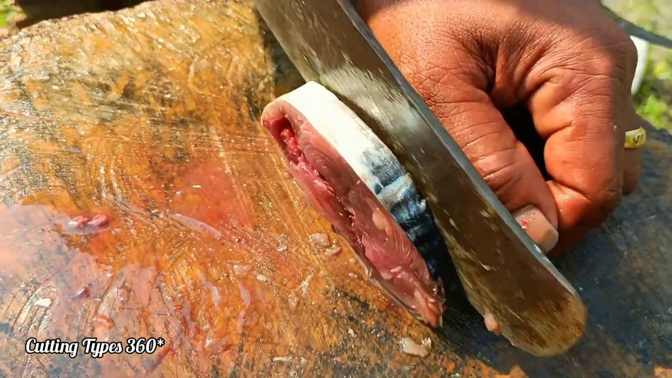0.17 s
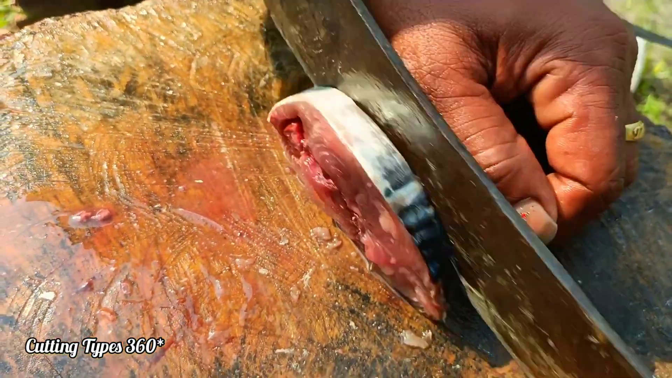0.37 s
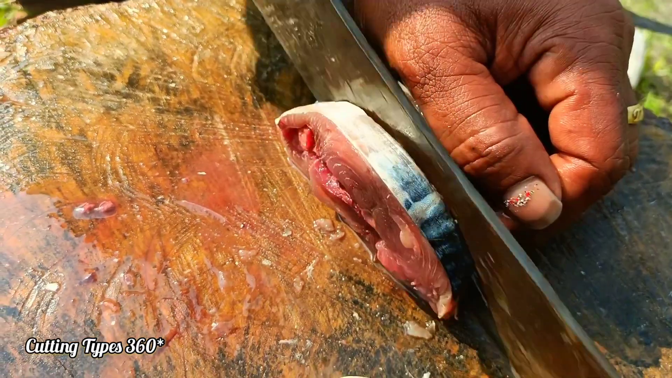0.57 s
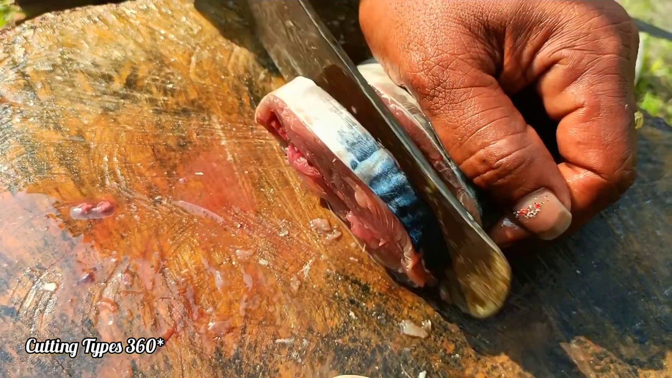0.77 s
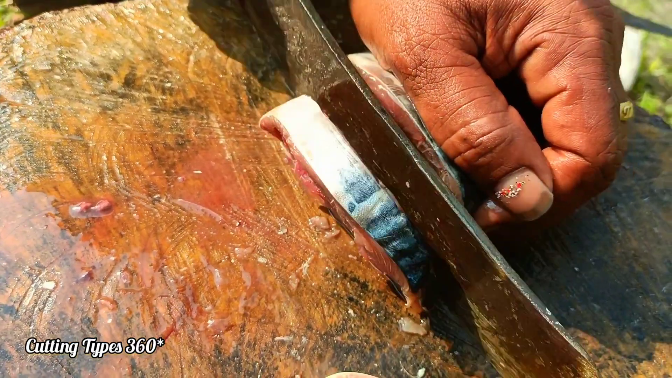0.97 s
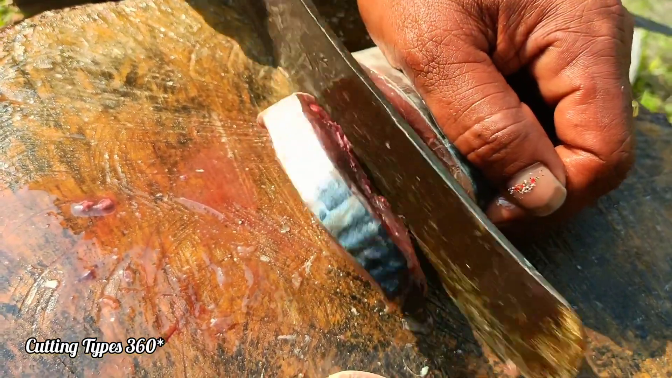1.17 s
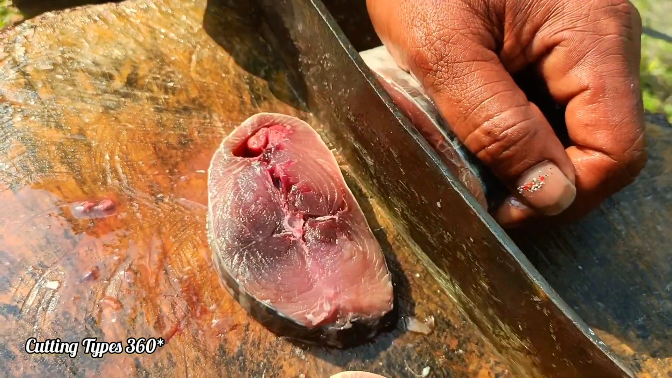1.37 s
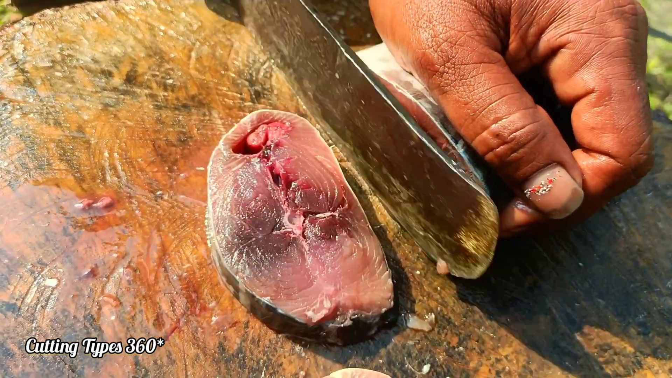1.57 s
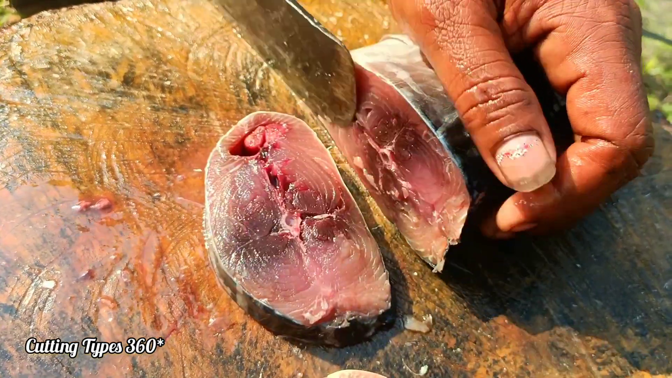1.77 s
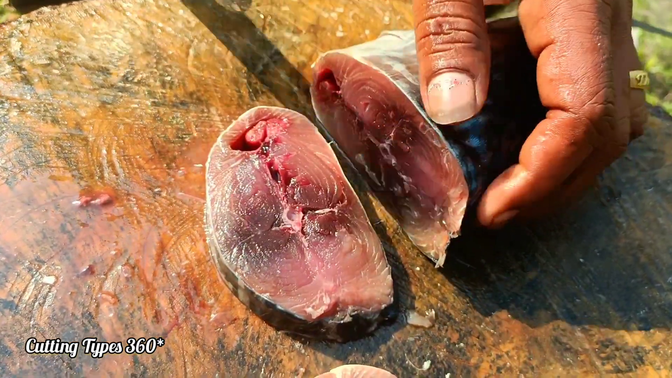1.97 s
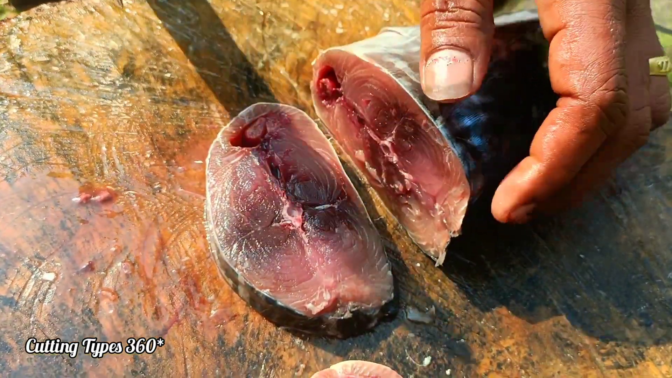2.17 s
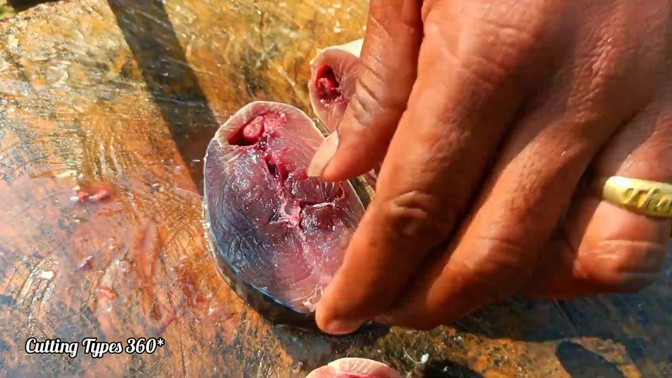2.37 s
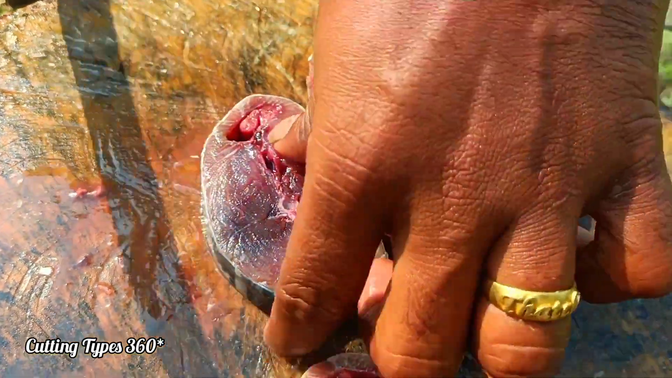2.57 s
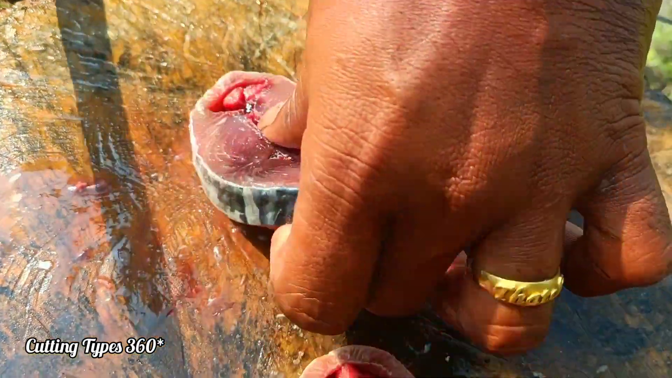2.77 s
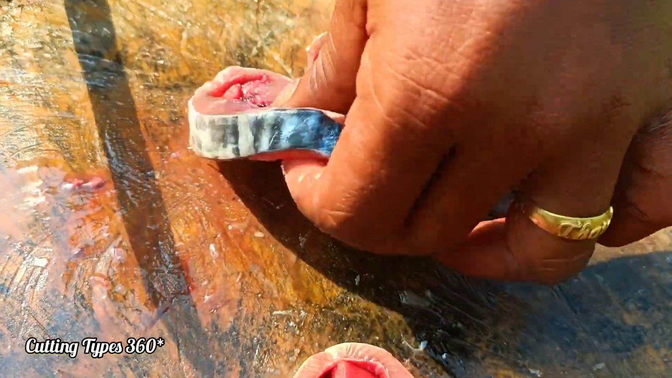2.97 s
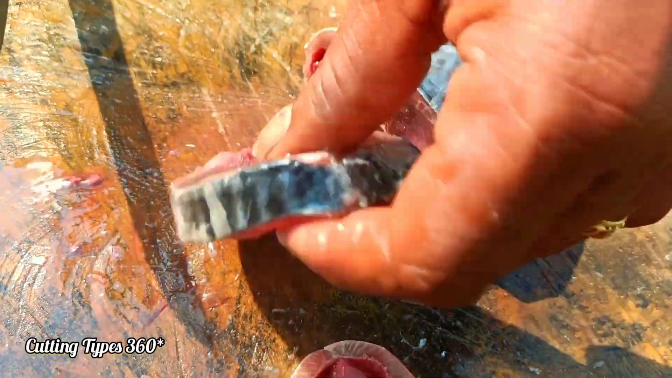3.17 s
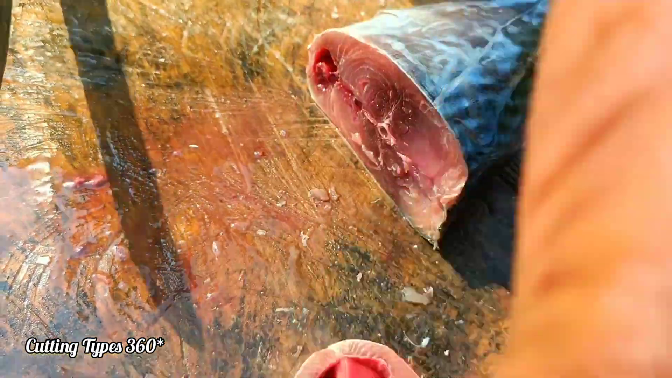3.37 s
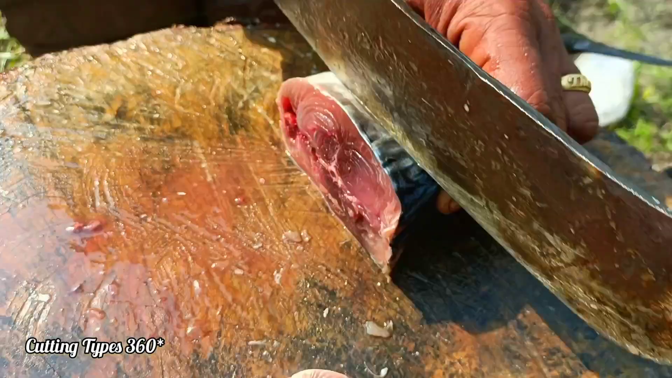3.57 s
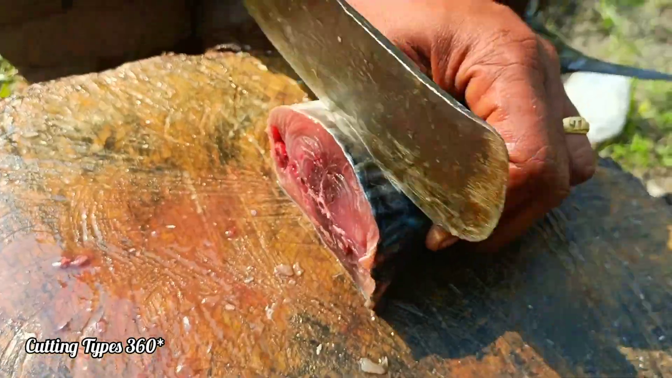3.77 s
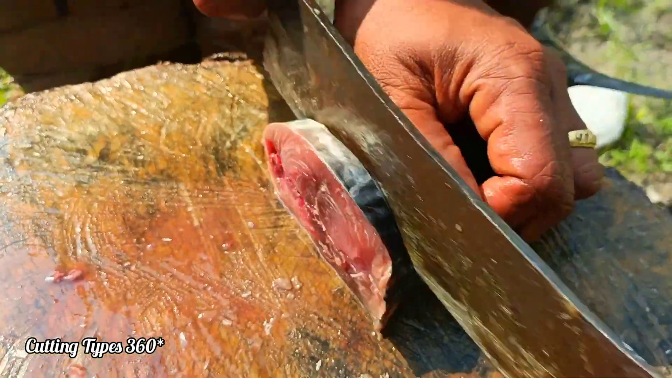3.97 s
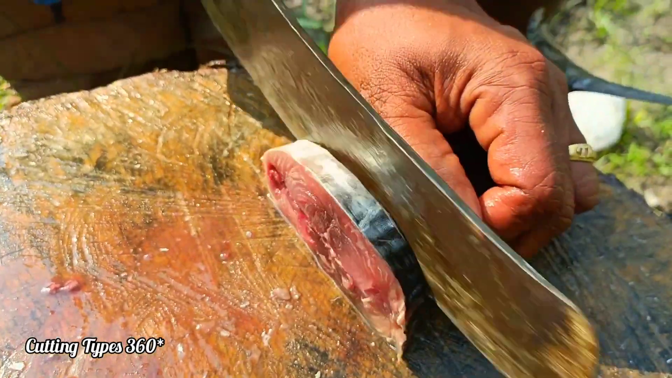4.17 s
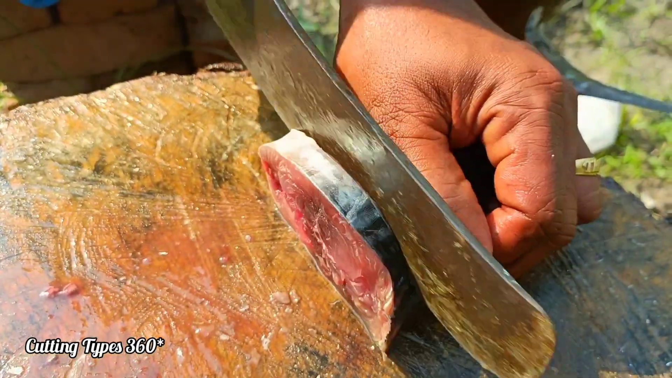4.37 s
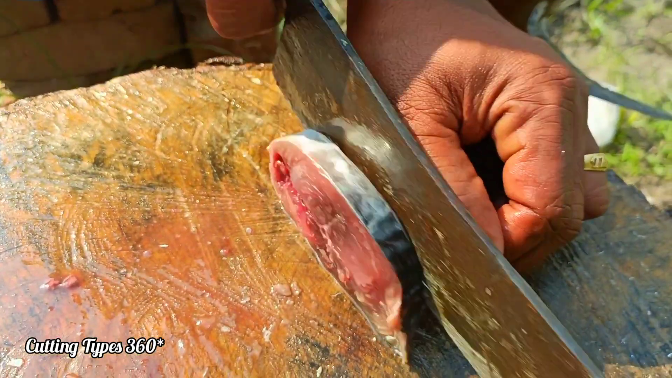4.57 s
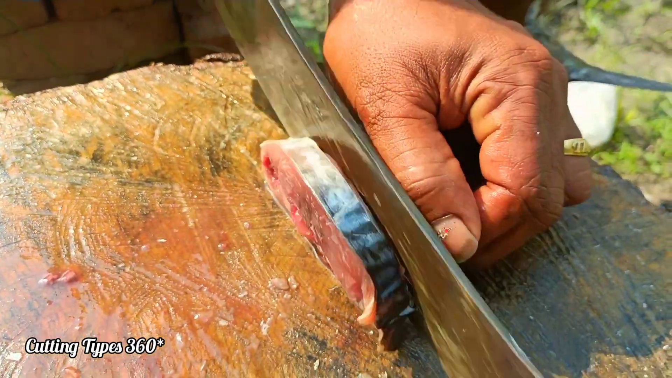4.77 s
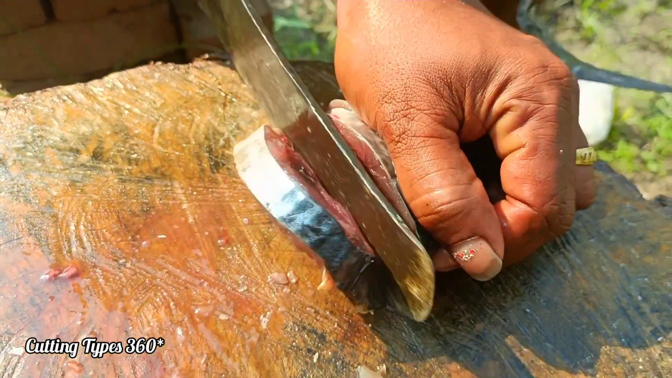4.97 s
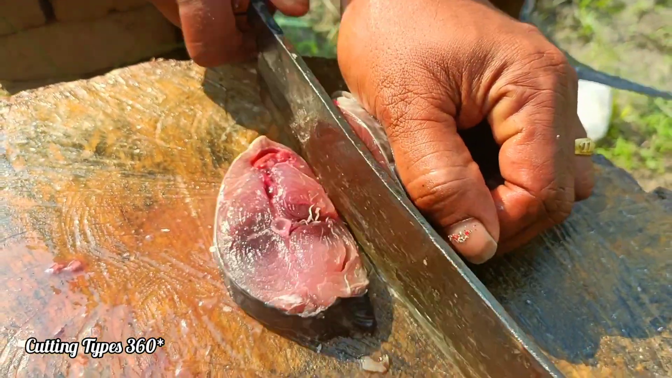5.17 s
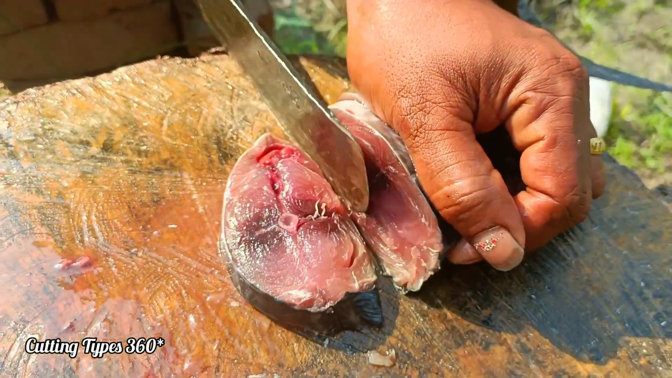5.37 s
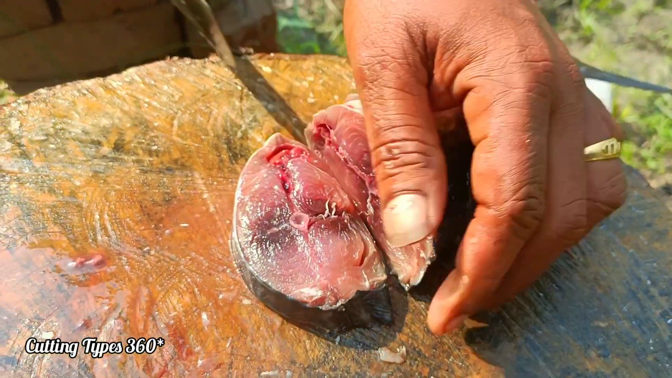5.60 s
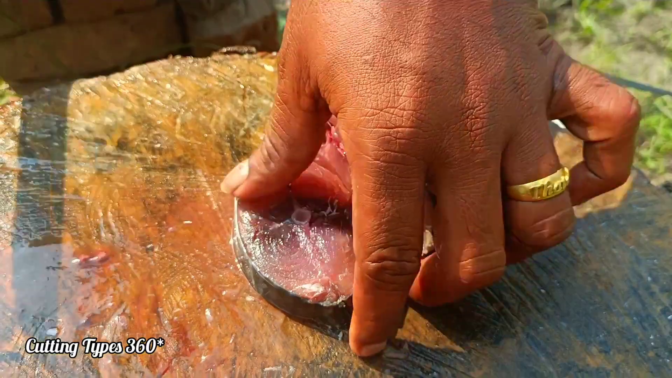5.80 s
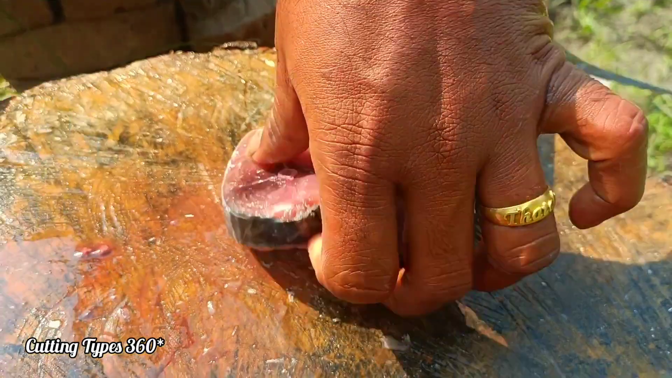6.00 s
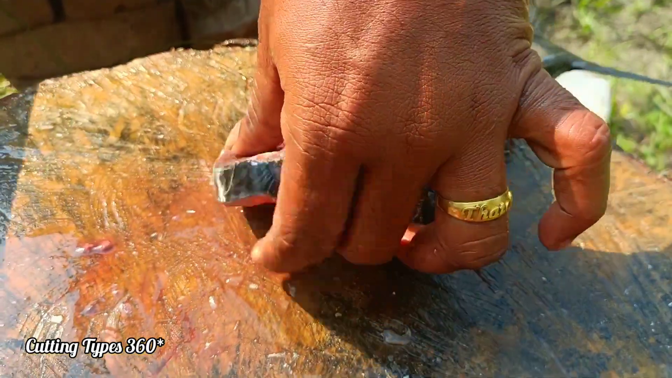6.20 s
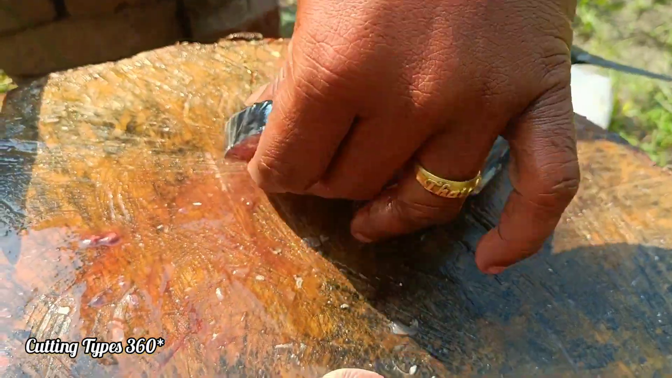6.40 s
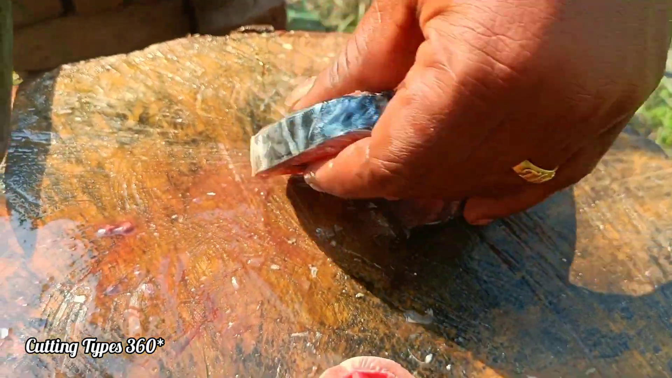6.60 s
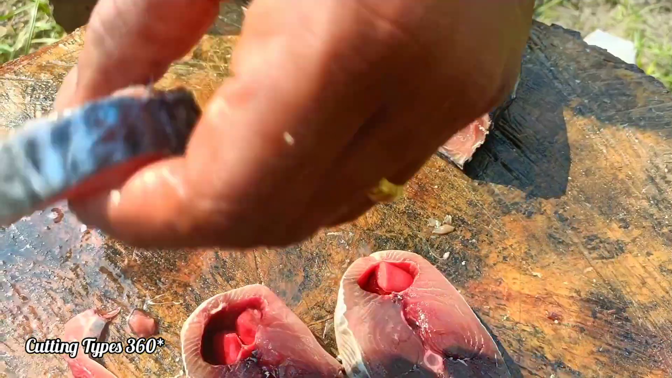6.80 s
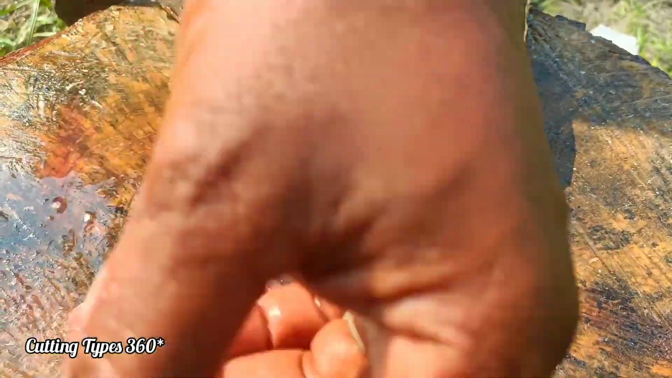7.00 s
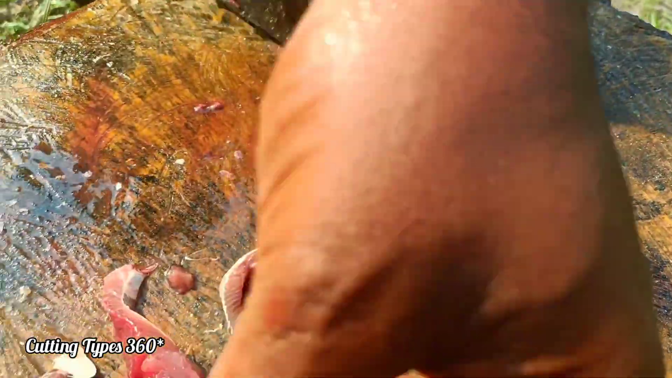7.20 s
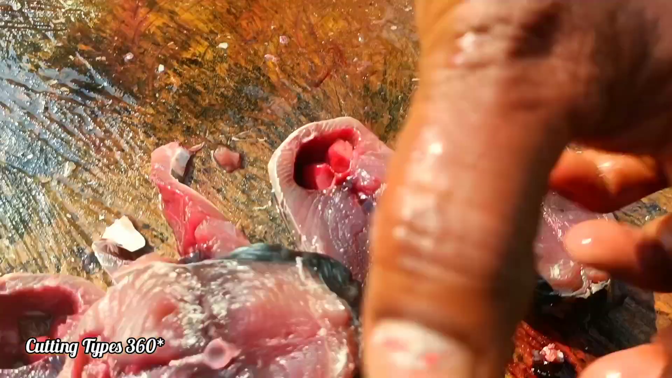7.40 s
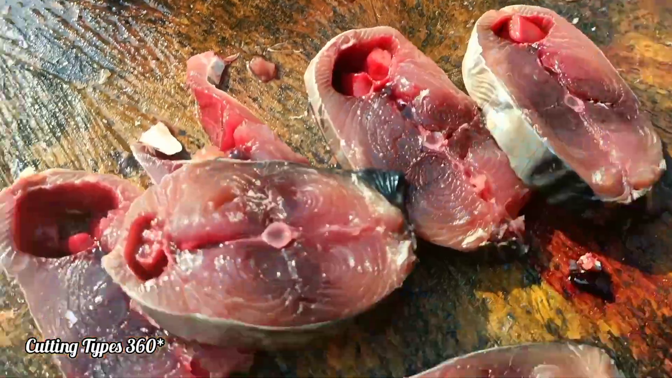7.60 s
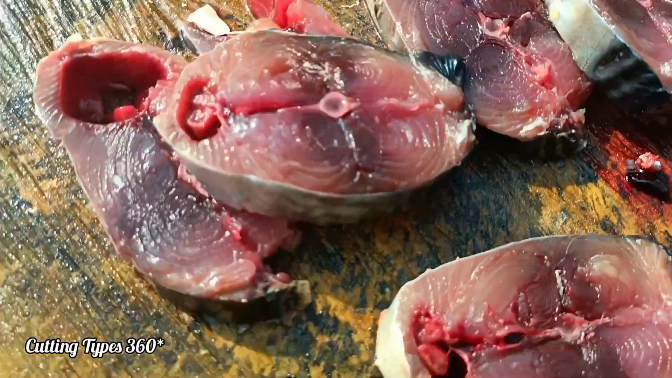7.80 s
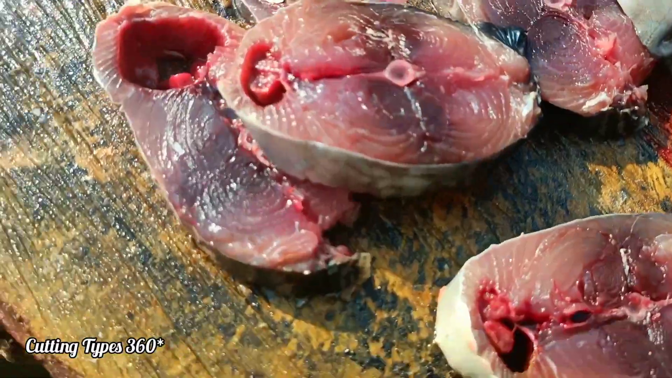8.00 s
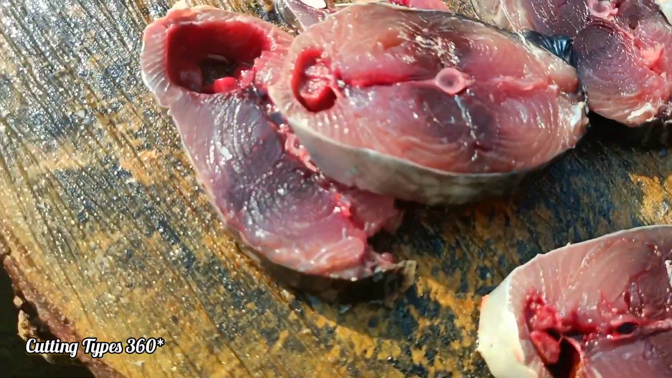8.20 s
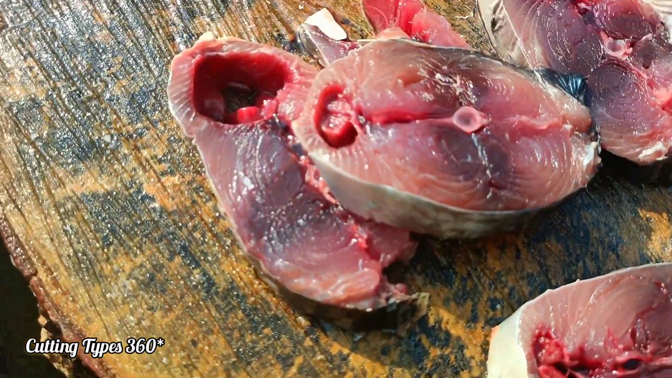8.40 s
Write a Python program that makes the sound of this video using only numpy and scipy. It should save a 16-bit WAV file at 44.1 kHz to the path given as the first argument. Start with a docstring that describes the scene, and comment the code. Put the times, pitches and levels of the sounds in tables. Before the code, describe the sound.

Two bursts of fast, grainy sawing with snapping fibres, a quiet handling gap after each, and finally a run of rubbery squeals.

```python
"""A heavy knife saws steaks off a fish on a wooden block outdoors: grainy friction noise, split into bands.
Noise bursts are snapping fibres, clicked modes are knocks on the wood, noise-fed modes are the dragged blade.
Rough squeals are stick-slip partials; low damped sines are soft low thumps of wind and handling at the microphones.
An insect buzzes in narrow-band noise over an open-air floor and a little wind.
Two microphone ports, each with its own resonances, pick up the scene."""
import sys
import numpy as np
from scipy import signal
from scipy.fft import rfft, irfft
from scipy.io import wavfile
from scipy.ndimage import uniform_filter1d

SR = 44100
rng = np.random.default_rng(int(sys.argv[2]) if len(sys.argv) > 2 else 0)


def master_out(mix):
    """Clip the mix to full scale and print it as 16-bit PCM to the path in sys.argv[1]."""
    frames = np.transpose(np.atleast_2d(mix))
    ceiling = np.clip(frames, -1, 1)
    pcm = np.round(ceiling * 32767).astype(np.int16)
    wavfile.write(sys.argv[1], SR, pcm)


N = 372644  # samples

# The blade's flat dragged over wood or bone. Each row: start and end of the full level in seconds,
# ringing level in dB, its change in dB, lift of the low modes in dB per octave.
DRAGS = [(1.45, 1.83, -59, -4.5, 3), (3.7, 3.766, -66.5, 5, -6), (3.85, 3.855, -57, 8, -8),
         (5.3, 5.43, -52.5, -12, 2.5), (5.49, 5.5, -52.5, -5, 0.5), (6.03, 6.13, -71, -14, 3),
         (6.162, 6.168, -64.5, 8.5, -18), (6.19, 6.196, -70.5, -11, 2.5), (6.212, 6.218, -57, -14, -5.5),
         (6.702, 6.748, -42, -10.5, -7.5)]
# Bending modes of the steel blade. Each row: frequency in Hz, level in dB, 60 dB decay time in seconds.
BLADE_MODES = [(1060, -12, .04), (1750, -8, .05), (2005, -9, .06), (2985, -9, .11), (3350, -12, .05),
               (4160, -5, .1), (4950, -14, .05), (5300, -12, .05), (6260, -8, .05), (7200, -13, .05),
               (8285, -6, .07), (9500, -12, .05), (12200, -21, .05), (13800, -21, .05), (15200, -21, .05)]
TOUCH_DB_PER_S, LIFT_DB_PER_S = 1211, 1097.5   # rise and fall of a drag
PORT_DELAY = 11   # samples; the ports lie a few cm apart


def amp(db):
    """Converts a level in dB to a linear gain."""
    return np.exp(np.asarray(db) * (np.log(10) / 20))


def unit(x):
    """Normalises power: scales to rms 1."""
    return x / np.sqrt(np.mean(x ** 2) + 1e-20)


def butter(x, hz, kind, order=2):
    """Limits the bandwidth with a maximally flat low-, high- or band-pass."""
    return signal.sosfilt(signal.butter(order, hz, kind, fs=SR, output="sos"), x)


def wander(rate_hz, size=1):
    """Slow random modulation: low-passed noise of rms 1."""
    step = 1 if rate_hz > 100 else 32   # drawn coarsely when it is slow
    noise = rng.standard_normal((size, N // step + 3000))
    slow = butter(noise, rate_hz * step, "low")[:, 2000:]   # the filter's onset is dropped
    return np.squeeze([np.interp(np.arange(N) / step, np.arange(len(v)), unit(v)) for v in slow])


def pair(x):
    """Spatial coherence: two draws become left and right, alike in the bass and unrelated above."""
    shared_hz = 680   # both ports hear the same pressure below this
    return butter(x[0], shared_hz, "low") + butter(x, shared_hz, "high")


def ring(x, hz, t60):
    """A damped resonator: a unit click sets a decaying sine of height 1 ringing."""
    radius = amp(-60 / (t60 * SR))
    w = 2 * np.pi * hz / SR
    return signal.lfilter([0, np.sin(w)], [1, -2 * radius * np.cos(w), radius * radius], x + 1e-18)


def peaks(x, table):
    """Resonances in series: a chain of filters, each a peak or a dip."""
    for hz, width_hz, db in table:
        w, g = 2 * np.pi * hz / SR, amp(db / 2)
        k = np.sin(w) * width_hz / hz / 2
        zeros = [1 + k * g, -2 * np.cos(w), 1 - k * g]
        poles = [1 + k / g, -2 * np.cos(w), 1 - k / g]
        x = signal.lfilter(zeros, poles, x)
    return x


def played(rows, rise_db_per_s, fall_db_per_s):
    """Masking by the loudest event: gives its level in dB, age in seconds and smoothed further columns.

    Each event rises, holds with a steady change and falls, all linear in dB."""
    t, rows = np.arange(N) / SR, np.array(rows, float)
    level_db, loudest = np.full(N, -120.0), np.zeros(N, int)
    rises = rise_db_per_s * np.ones(len(rows))
    for k, ((start, end, db, change_db), rise) in enumerate(zip(rows[:, :4], rises)):
        times = [start - 1, start, max(end, start + 1 / SR), end + 1]
        own_db = db + np.interp(t, times, [-rise, 0, change_db, change_db - fall_db_per_s])
        loudest[own_db > level_db] = k
        level_db = np.maximum(level_db, own_db)
    age = t - rows[loudest, 0]
    return level_db, age, *uniform_filter1d(rows[loudest, 4:].T, size=300)


def air():
    """Diffuse noise with a shaped spectrum is far rustle and rumble; wind adds separate lumpy bass at each port."""
    # Spectrum of the open-air floor. Each row: frequency in Hz, relative level in dB per Hz.
    air_spectrum = [(30, -45), (70, -29.5), (120, 2.5), (180, -7.5), (280, -14), (600, -17.5),
                    (2000, -22.5), (5000, -29.5), (9000, -35.5), (16000, -34)]
    points_hz, points_db = np.transpose(air_spectrum)
    hz = np.maximum(np.arange(N // 2 + 1) * SR / N, 1)
    shape = amp(np.interp(np.log(hz), np.log(points_hz), points_db))
    far = unit(irfft(rfft(pair(rng.standard_normal((2, N)))) * shape, N))
    wind = unit(butter(rng.standard_normal((2, N)), [45, 130], "band")) * amp(1.3 * wander(3))
    return amp(-65.5) * far + amp([[-68], [-75]]) * wind


def insect():
    """Narrow-band noise from one sharp resonance makes short buzzes that swell and fade."""
    # Each row: start in seconds, length in seconds, level in dB.
    buzz_rows = [(2.193, 0.18, -67.5), (2.786, 0.15, -71.5), (3.364, 0.13, -70), (7.163, 0.17, -71.5),
                 (7.859, 0.12, -72)]
    buzz_hz, width_hz = 7500, 130
    swell = np.zeros(N)
    for s, length, db in buzz_rows:
        at, n = round(s * SR), round(length * SR)
        swell[at:at + n] = amp(db) * np.sqrt(np.hanning(n))
    t60 = np.log(1000) / np.pi / width_hz   # a narrow resonance decays slowly
    return swell * unit(ring(rng.standard_normal((2, N)), buzz_hz, t60))


def thumps():
    """Heavily damped low resonance: soft low thumps of wind and handling at the microphones."""
    # Each row: time in seconds, level in dB, frequency in Hz, left-right difference in dB.
    thump_rows = [(2.31, -51, 116, 10), (3.315, -38, 97.5, 22), (3.441, -41.5, 70.5, 19.5),
                  (3.967, -51, 96, -22), (5.119, -45, 102, 15), (6.222, -36.5, 68.4, 18),
                  (8.098, -44, 107.4, -12), (8.298, -39, 107, 6)]
    out = np.zeros((2, N))
    for s, db, hz, pan_db in thump_rows:
        push = np.zeros(N)
        push[round(s * SR)] = amp(db)
        thump = butter(ring(push, hz, 0.038), 194, "low", order=4)
        out += thump * amp([[pan_db / 2], [-pan_db / 2]])
    return out


def knocks():
    """Impulse response of a modal body: the edge meets the block and its modes ring."""
    # Each row: time in seconds, relative level in dB.
    knock_rows = [(0.627, -28), (4.812, -19.5), (5.981, -29)]
    # Modes of the wooden block. Each row: frequency in Hz, level in dB, 60 dB decay time in seconds.
    block_modes = [(279, 8, 0.045), (429, 9, 0.025), (539, -2.5, 0.043), (1000, -9.5, 0.042),
                   (1420, -14, 0.0093)]
    hits = np.zeros(N)
    for s, db in knock_rows:
        hits[round(s * SR)] = amp(db - 7.5)
    out = sum(amp(db) * ring(hits, hz, t60) for hz, db, t60 in block_modes)
    return np.array([butter(out, 296, "high", order=3)] * 2)


def snaps():
    """Sudden release of tension: each snap is a noise burst of a millisecond or two in three bands."""
    # Fibres snap, the edge ticks, fingers unstick. Each row: time in seconds, relative level in dB,
    # dull part in dB, bright part in dB, left-right difference in dB.
    snap_rows = [(0.0916, -2, -14, -15, 2), (0.253, -14, -11, -19, -6), (0.2746, -14, -6, -18, -8),
                 (0.2916, -4, -15, -16, -1), (0.3348, -10, -9, -10.5, -5), (0.3902, -17.5, -7, -9, 3),
                 (0.3995, -16, -29, -14, -5), (0.4215, -8.5, -18, -9, -3), (0.443, -7, -5, -18, 11),
                 (0.477, -14, -17.5, -14, -0.5), (0.56, -9.5, -6.5, -22, 4.5), (0.576, -11, -2.5, -27, 6),
                 (0.636, -23, 4.5, -27, 20), (0.7085, -27, 5, -26, 20), (0.8, -20.5, -22, -7.5, 14),
                 (0.86, -17, -35, -22, 0), (1.03, -21, -30, -26, 1), (1.1815, -24, -27, -22, 1),
                 (1.2982, -26, 4.5, -9, -3), (1.3051, -21, -13, -10, 4.5), (1.3128, -33.5, -1.5, -15, -23),
                 (2.1944, -53, 18, -29, 5), (2.456, -50, 8, -14, -4), (2.6398, -36, -12, -2, -3),
                 (2.685, -47.5, 15, -27, 7), (2.7036, -37, -12, -27, 7), (2.8024, -58, -18, -3, -4),
                 (2.835, -55, -7.5, -5, 10), (3.3597, -58.5, -26.5, 7, -0.5), (3.4087, -58.5, -21, 35.5, 0),
                 (3.5084, -21, -4.5, -15, -9), (3.5298, -8, -8, -4.5, -3.5), (3.898, -15, -6.5, -14, -3),
                 (3.9542, -17, -9, -27, -1), (4.15, -26, -1, -5.5, 3), (4.2905, -21, -8, -30, 11),
                 (4.4482, -32, -28, -1, 9), (4.4726, -16, -4, -10, 4), (4.5573, -5.5, -7.5, -12, -2.5),
                 (4.621, -9.5, -30, -14.5, 7), (4.7548, -21.5, 2, 5, -4), (4.8747, -14.5, 1, -20, 8.5),
                 (5.0513, -21, -22, -14, 3), (5.166, -22, -4.5, -10, 5), (5.493, -41, -2, -17, 5),
                 (5.7867, -65, 6, 19, -2.5), (6.3447, -52, -14.5, 12.5, -4), (6.516, -52, -20, -7, 7),
                 (6.6024, -71, -19, 9, 8), (6.6834, -23, 0, -16, -5), (6.6928, -22.5, -5.5, -9, 9),
                 (7.3672, -54, -5, -1.5, 27.5), (7.3744, -43.5, -7.5, 15, -4), (7.4268, -35, 17, -12, -8.5),
                 (7.463, -16.5, -8, -18.5, -2.5)]
    decay_s, attack_s, length = .0016, .0003, 600   # length in samples
    out, t = np.zeros((2, N + length)), np.arange(length) / SR
    puffs = rng.standard_normal((len(snap_rows), 2, length))
    for (s, db, dull_db, bright_db, pan_db), puff in zip(snap_rows, puffs):
        burst = puff * np.exp(-t / decay_s) * np.minimum(t / attack_s, 1)
        crack = butter(burst, [3400, 7200], "band", order=3)
        crack += amp(dull_db + 3.0) * butter(burst, [900, 3200], "band")
        bright_hz = np.clip(8986 + 150 * bright_db, 7000, 12500)   # a stronger bright part starts higher
        crack += amp(bright_db + 12) * butter(burst, bright_hz, "high", order=3)
        at = round(s * SR)
        out[:, at:at + length] += amp(db - 8) * crack * amp([[pan_db / 2], [-pan_db / 2]])
    return out[:, :N]


def squeals():
    """Stick-slip oscillation, about a thousand a second; roughness smears the partials, the upper ones most."""
    # Each row: start and end of the full level in seconds, relative level in dB, its change in dB,
    # swell in seconds, slip rate in Hz, rate it slides to in Hz, roughness 0-1, pressure 0-1,
    # odd partials from the third up in dB (every second slip is weaker at times).
    squeal_rows = [(2.355, 2.448, -69, 11.5, 0.12, 737, 782, 0.98, 0.38, -22),
                   (2.677, 2.675, -59.5, -1.5, .025, 583, 900, 0.6, 0.44, -13),
                   (4.58, 4.651, -41.5, 2, .015, 936, 996, 0.36, 0.66, -34),
                   (5.795, 5.815, -59, -2, .03, 1000, 1036, 0.93, 0.24, -25),
                   (5.865, 5.961, -41, 3.5, 0.06, 949, 1071, 0.4, 0.69, -15.5),
                   (6.005, 6.026, -42, -3, 0.014, 1000, 1040, 1, 0.45, -14),
                   (6.09, 6.1, -55, 4.5, 0.029, 993, 920, 0.94, 0.32, -31),
                   (7.335, 7.348, -48.5, -0.5, .012, 993, 780, 0.37, 0, 2.5),
                   (7.365, 7.4, -51.5, -3, 0.029, 810, 850, 0.72, 0.16, 12.5),
                   (7.417, 7.449, -47.5, -4.5, 0.0094, 1158, 1030, 0.8, 0.59, 6),
                   (7.493, 7.54, -51, -3.5, 0.06, 1064, 1016, 0.66, 0.58, 0),
                   (7.581, 7.572, -57, 0.5, .03, 1014, 1010, 0.94, 0.38, 5),
                   (7.615, 7.624, -69.5, -2, 0.034, 987, 988, 1, 0.46, 10.5),
                   (7.705, 7.744, -48, 8.5, .03, 991, 1079, 0.58, 0.55, 3.5),
                   (7.798, 7.823, -41.5, -8, 0.0088, 1024, 930, 0.39, 0.44, 5.5),
                   (7.904, 7.907, -60, -0.5, 0.0074, 983, 960, 0.49, 0.27, -7),
                   (7.931, 7.97, -45.5, 11.5, 0.013, 973, 1049, 0.5, 0.36, -7),
                   (7.96, 8.009, -37.5, -11, 0.032, 1013, 1004, 0.57, 0.41, -0.5),
                   (8.04, 8.042, -35.5, -2.5, 0.0048, 1022, 697, 0.15, 0.12, -13.5),
                   (8.076, 8.09, -60.5, -3, 0.015, 965, 996, 0.8, .03, -6)]
    # Each row: multiple of the slip rate, level in dB at no pressure, level in dB at full pressure.
    partials = [(1, -6, -31), (2, 6.5, 0.5), (3, -9, 6), (4, -41.5, 17), (5, -25.5, -13.5), (6, -54, -13),
                (7, -33, -26.5), (8, -53.5, -9.5), (9, -59.5, -10.5)]
    swell_db, die_db_per_s, slide_s = 25.5, 698.5, .046
    rises = swell_db / np.transpose(squeal_rows)[4]
    db, age, _, first_hz, last_hz, rough, pressure, odd_db = played(squeal_rows, rises, die_db_per_s)
    # The slide is already under way during the swell.
    hz = first_hz + (last_hz - first_hz) * np.clip(age / slide_s, -1.1, 1)
    phase = 2 * np.pi * np.cumsum(hz * (1 + 0.01044 * wander(135))) / SR
    out = 0
    for k, soft_db, hard_db in partials:
        smear = np.clip(rough * (0.5 + 0.21 * k), 0, 1)
        a, b = wander(110 + 35 * k, size=2)
        flutter = a * np.cos(k * phase) + b * np.sin(k * phase)   # a partial widened into a noise band
        line = np.sqrt(2) * np.sin(k * phase) * (1 + rough * wander(73))
        partial_db = soft_db + pressure * (hard_db - soft_db)
        if k % 2 and k > 1:
            partial_db = partial_db + odd_db
        out = out + amp(partial_db) * ((1 - smear) * line + smear * flutter)
    # Pressed hard, the contact also rasps, more so in loud squeals.
    hiss = unit(butter(rng.standard_normal(N), [2700, 7500], "band"))
    rasp_db = -7.5 + 0.61 * (db + 38.5)
    out = out + amp(rasp_db) * pressure ** 2 * amp(3 * wander(90)) * hiss
    call = amp(db + 5.5) * out
    # The steel rings along.
    call = call + 0.011 * sum(amp(mode_db) * ring(call, mode_hz, t60) for mode_hz, mode_db, t60 in BLADE_MODES)
    echo = 0.11 * np.roll(call, round(.031 * SR))   # off a nearby wall
    left = np.roll(call, 10) * amp(-7.0) + echo     # later and weaker than the right
    right = call + np.roll(echo, 300)
    return np.array([left, right])


def blade():
    """Friction-driven modal vibration: rubbing noise feeds the steel's modes, each with a changing grip."""
    ring_db, _, lift_db = played(DRAGS, TOUCH_DB_PER_S, LIFT_DB_PER_S)
    out, grips = 0, amp(3.2 * wander(10.2, size=len(BLADE_MODES)))
    for (hz, db, t60), grip in zip(BLADE_MODES, grips):
        drive_db = ring_db + db + lift_db * np.log2(8000 / hz)
        rub = amp(drive_db) * grip * rng.standard_normal(N)
        out = out + ring(rub, hz, t60) / np.sqrt(t60 * SR / 120.0)   # long modes gather more noise
    return np.array([out, np.roll(out, PORT_DELAY)])


def hollows(x, patch_db, rate_hz):
    """Cavity resonance of blade, slice and block: narrow bands swell and fade at random, each on its own."""
    out = butter(x, 9800, "high", order=4)
    swell = amp(patch_db * wander(rate_hz, size=48))
    swell = swell / np.sqrt(uniform_filter1d(swell ** 2, size=9, axis=0))   # neighbours share the same energy
    for k, hz in enumerate(np.geomspace(380, 9500, num=48)):
        band = butter(x, [hz / 1.022, hz * 1.022], "band", order=1)
        out = out + (-1) ** k * swell[k] * band
    return out


def sawing():
    """Granular friction: the edge tears fibres in dense uneven grains that clump; a flat drag sounds hollower."""
    # Saw strokes and rubs. Each row: start and end of the full bite in seconds, friction level in dB,
    # its change over the stroke in dB, then relative levels in dB of the slice's body, the flesh,
    # the lower edge noise and the skin.
    stroke_rows = [(0.0, 0.024, -35, -3.5, 1, -7.5, 3, -1.5), (0.118, 0.196, -29.5, -9.5, -8, -12, 2, -3),
                   (0.259, 0.331, -30.5, 6, -8, -10.5, -6, -15),
                   (0.418, 0.478, -26.5, 6.0, -11, -10, 0.0, -9.0),
                   (0.582, 0.636, -24.5, 1, -17, -10, -3.0, -8),
                   (0.708, 0.804, -30.0, 1, -8.5, -9.5, -3.5, -12),
                   (0.882, 0.966, -33.5, -4, -5, -12.0, 1.5, -8),
                   (1.048, 1.11, -37.5, 0.5, -0.5, -15, 2, -9.5),
                   (1.175, 1.252, -32.0, -7, -1.5, -13, -1.0, -11.0),
                   (1.43, 1.644, -41.0, 0.5, -1, -20, 5, -4.5), (1.66, 1.83, -41, -4.5, -6.5, -4, 2, -2.5),
                   (2.296, 2.32, -58, -6, -12, -3.5, -3, -4), (3.531, 3.535, -37.5, -7, -1, -11, 7, 2),
                   (3.69, 3.778, -54, -0.5, -24, -9, 5.5, 6.5),
                   (3.848, 3.93, -44, 3, -15.5, -12, 0.5, -0.5),
                   (4.001, 4.085, -41, 3, -2, -7.5, -0.5, -2.5),
                   (4.173, 4.231, -33.5, -0.5, -3.5, -11.5, -5.5, -4.5),
                   (4.314, 4.398, -37.0, -4.5, -5, -9.5, 1.5, 1),
                   (4.484, 4.545, -30, 0.0, -14, -9, -0.5, -3.5),
                   (4.624, 4.704, -31.5, -2, -9, -12.5, 1.5, -6.5),
                   (4.761, 4.841, -28, 3.5, -11.5, -13, -4.5, -10.5),
                   (4.885, 4.991, -30, 0.5, -16.5, -10.5, -1.0, -8.0),
                   (5.056, 5.138, -34.5, 6.5, -3.5, -18, -0.5, -9.0),
                   (5.202, 5.25, -37.5, 11.5, -13, -12.5, 2.0, -8.5),
                   (5.26, 5.4, -29.5, -13, -16, -11.5, 0, -6),
                   (5.45, 5.52, -36.5, 0.5, -26, -9.5, -13.5, -10.5),
                   (6.714, 6.735, -42.5, -10, -6, -6, 0, 6.5)]
    bite_db_per_s, ease_db_per_s = 787.5, 700
    friction_db, _, body_db, flesh_db, low_edge_db, skin_db = played(stroke_rows, bite_db_per_s, ease_db_per_s)
    torn = rng.random(N) < 2500 * amp(5 * wander(60)) / SR   # thousands of tears a second, clumping
    sizes = torn * amp(3.5 * np.minimum(rng.exponential(1, N), 4))
    # Each tear hisses for a fraction of a millisecond.
    grit = 1.2 + 0.35 * unit(signal.lfilter([1], [1, -.93], sizes))
    dragged = 1.0 * (played(DRAGS, TOUCH_DB_PER_S, LIFT_DB_PER_S)[0] > -90)
    depth_db = 4.5 + 3 * uniform_filter1d(dragged, size=200)
    near, other = rng.standard_normal((2, N))
    both = pair(np.array([near, 0.16 * np.roll(near, PORT_DELAY) + 0.97 * other]))
    noise = hollows(both * grit * amp(1.2 * wander(35)), patch_db=depth_db, rate_hz=7)
    noise = peaks(noise, [(1159, 1200, 1.5), (2450, 700, -9)])   # the slice's body and a gap above it
    body = amp(body_db - 17) * unit(butter(noise, [330, 780], "band", order=1))
    flesh = amp(flesh_db - 2.5) * unit(butter(noise, [780, 2300], "band"))
    low_edge = amp(low_edge_db - 11.5) * unit(butter(noise, [2500, 4300], "band"))
    edge = amp(-9.5) * unit(butter(noise, [4300, 7200], "band"))
    skin = amp(skin_db + 1.0) * unit(butter(noise, 5980, "high"))
    # Alternate signs join the parts without a notch.
    return amp(friction_db) * (flesh - body - low_edge + edge - skin)


def scene():
    """Superposition: the pressures of all sources add at the two ports."""
    return air() + insect() + thumps() + knocks() + snaps() + squeals() + blade() + sawing()


def record(dry):
    """Port resonance colours each side; deep bass and the top are cut."""
    # Resonances of each port. Each row: frequency in Hz, width in Hz, level in dB.
    left_port = [(3704, 1200, 2.5), (6320, 3170, -12), (8200, 2570, 13.5)]
    right_port = [(2500, 1500, 2.5), (4440, 2080, 10), (5930, 1840, 14.5), (9300, 16500, -5.5),
                  (15000, 3100, -4)]
    coloured = np.array([peaks(dry[0], left_port), peaks(dry[1], right_port)])
    ports = butter(coloured, 49, "high")
    top_cut = signal.cheby2(22, 70, 16350, fs=SR, output="sos")   # 70 dB down from 16350 Hz
    return signal.sosfilt(top_cut, ports)


dry = scene()
out = record(dry)
master_out(out)
```